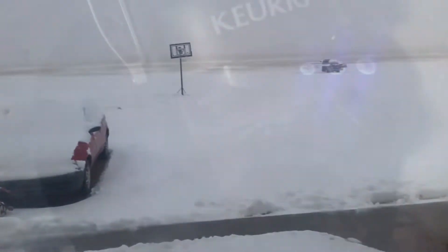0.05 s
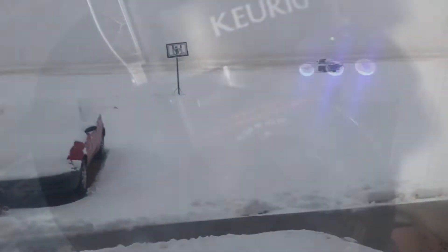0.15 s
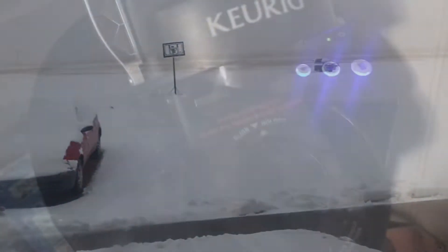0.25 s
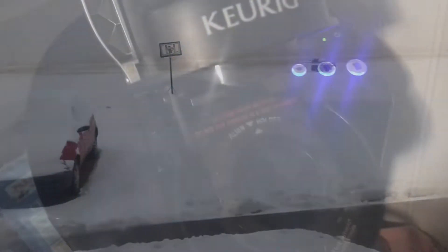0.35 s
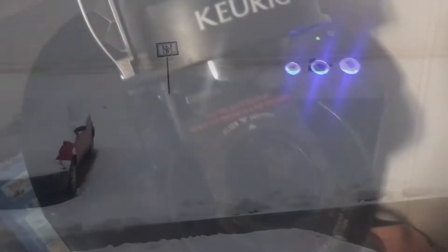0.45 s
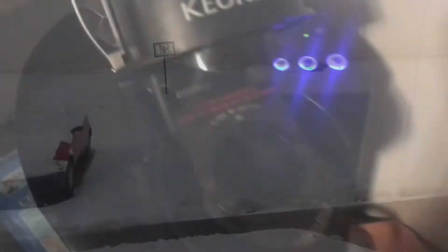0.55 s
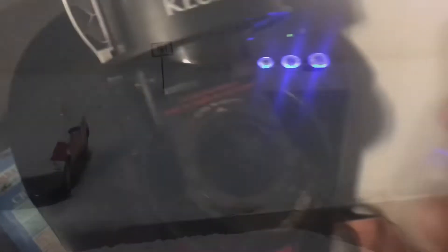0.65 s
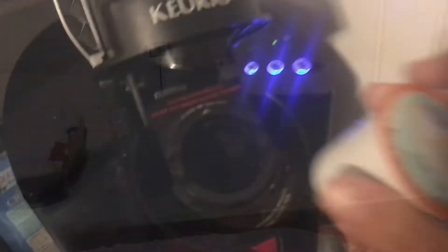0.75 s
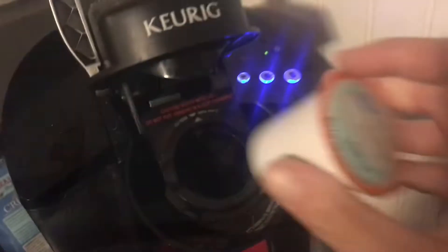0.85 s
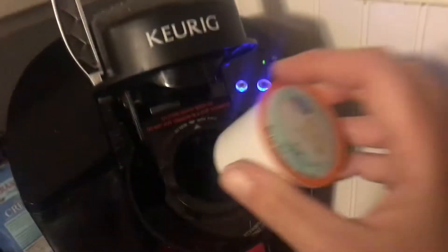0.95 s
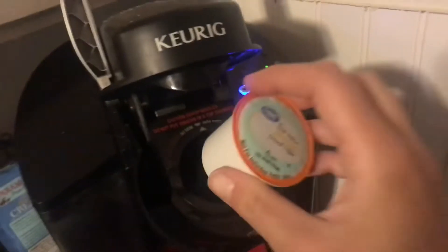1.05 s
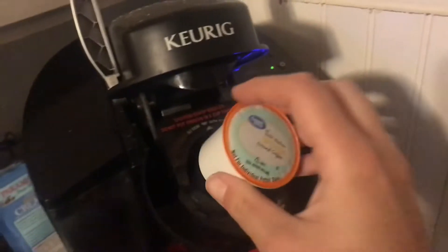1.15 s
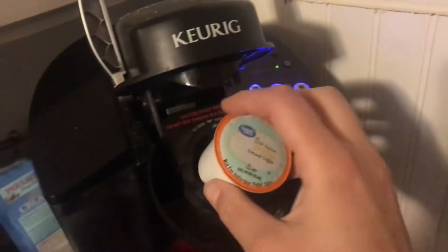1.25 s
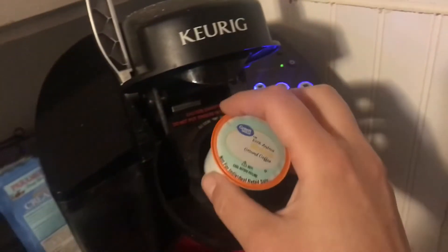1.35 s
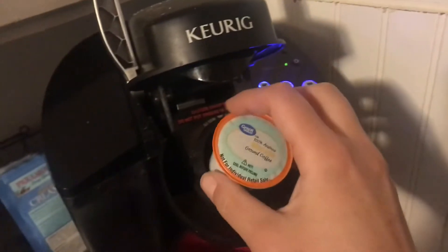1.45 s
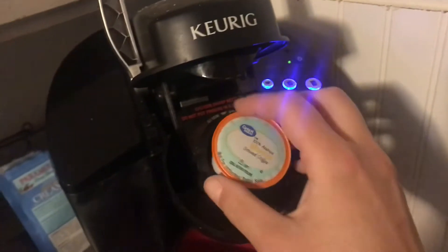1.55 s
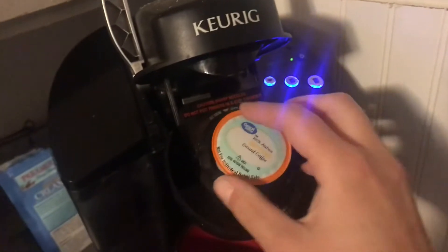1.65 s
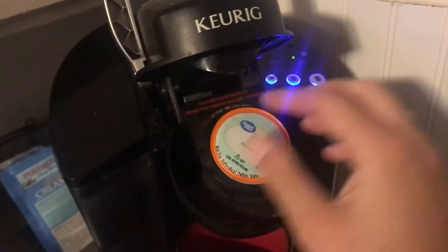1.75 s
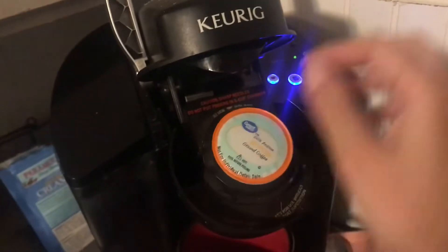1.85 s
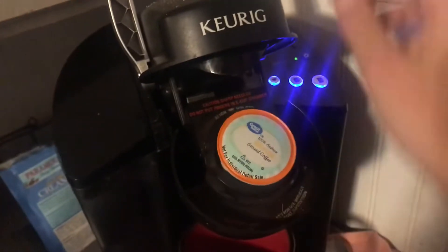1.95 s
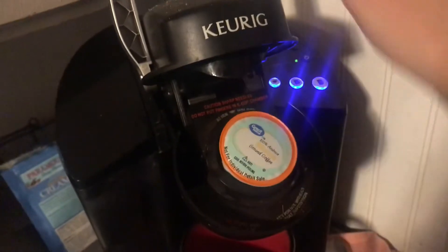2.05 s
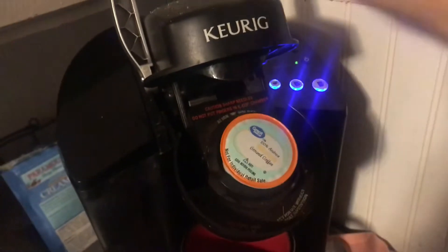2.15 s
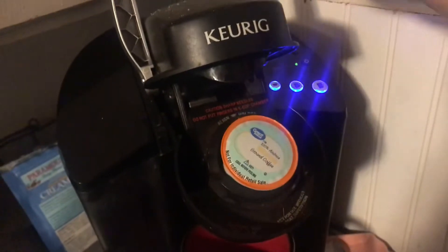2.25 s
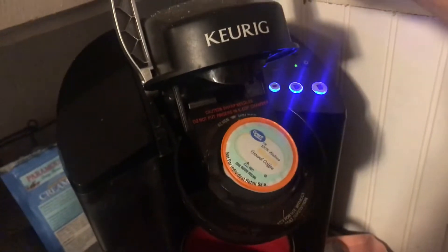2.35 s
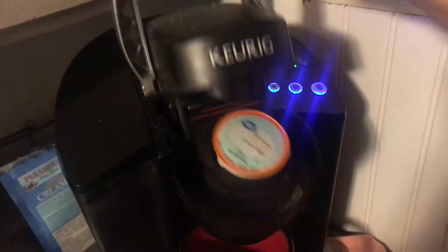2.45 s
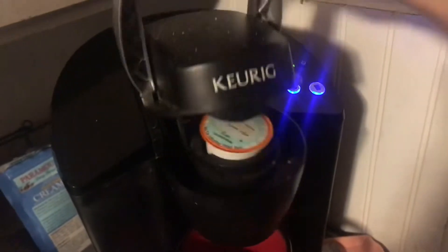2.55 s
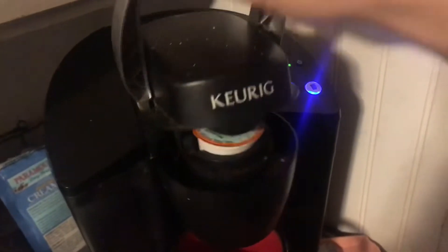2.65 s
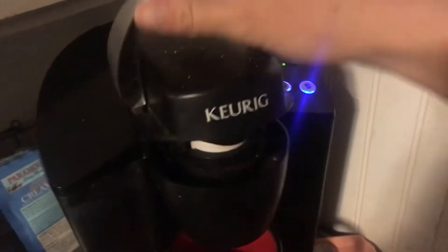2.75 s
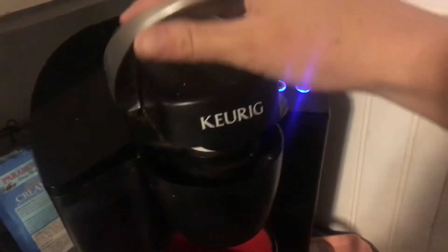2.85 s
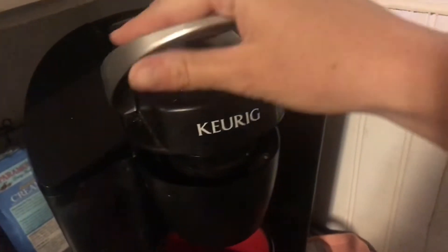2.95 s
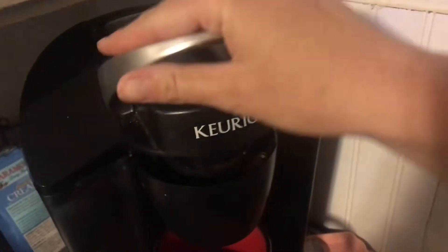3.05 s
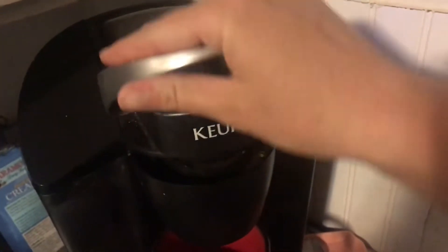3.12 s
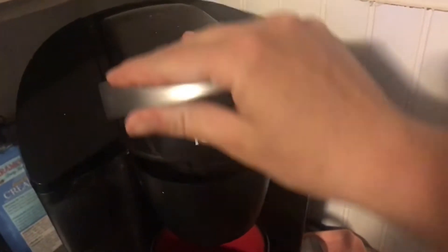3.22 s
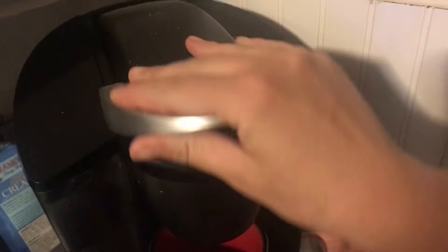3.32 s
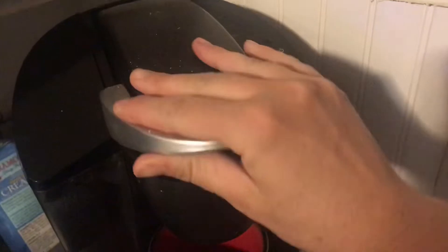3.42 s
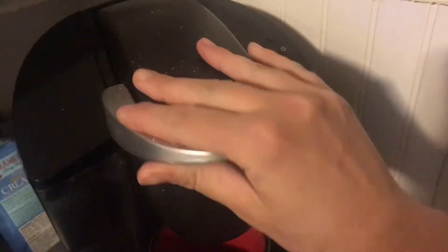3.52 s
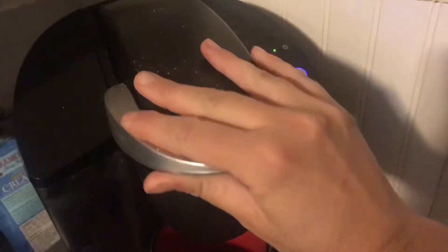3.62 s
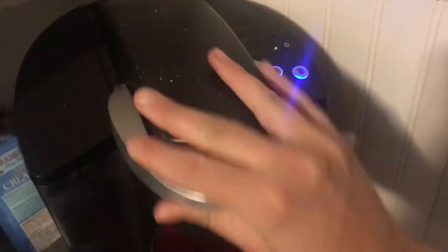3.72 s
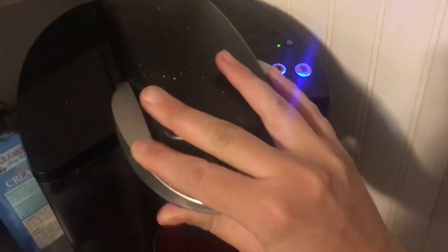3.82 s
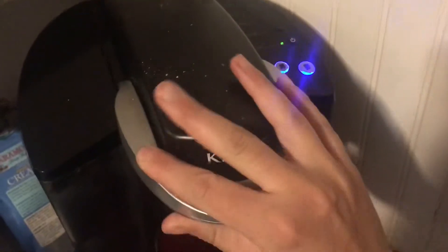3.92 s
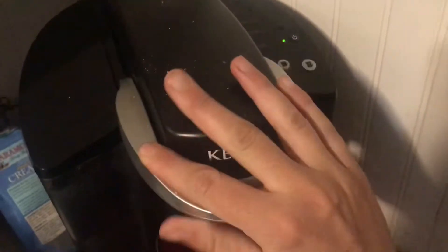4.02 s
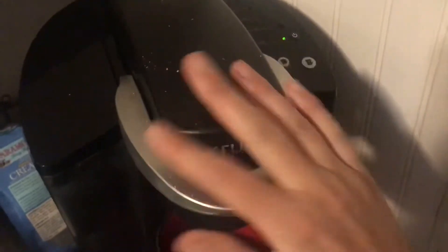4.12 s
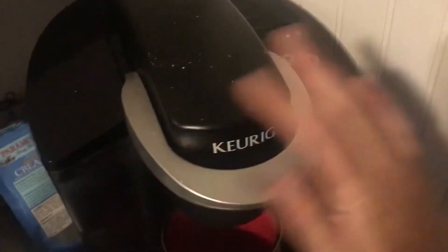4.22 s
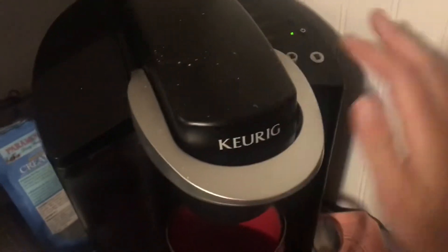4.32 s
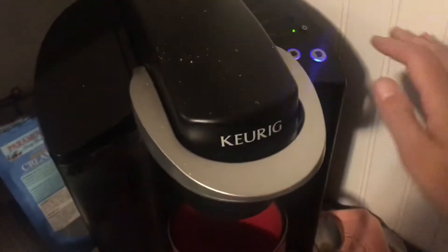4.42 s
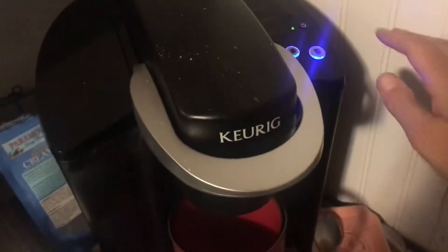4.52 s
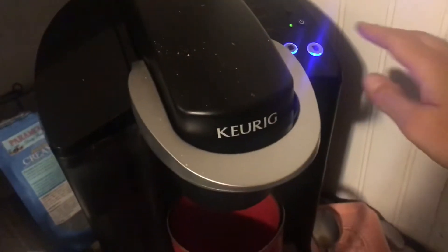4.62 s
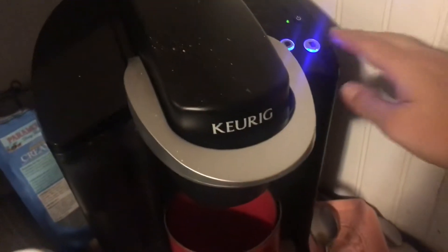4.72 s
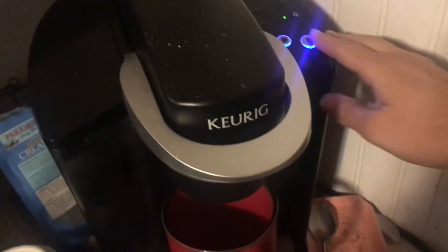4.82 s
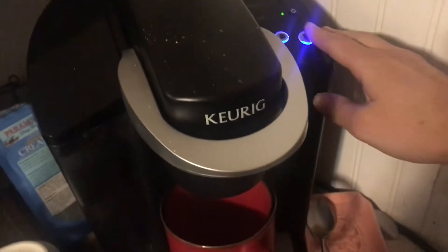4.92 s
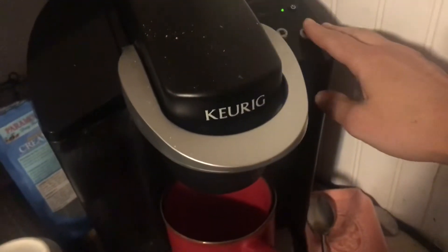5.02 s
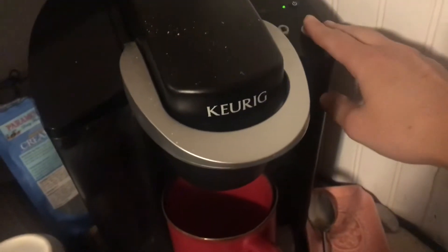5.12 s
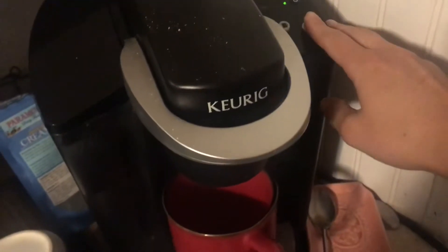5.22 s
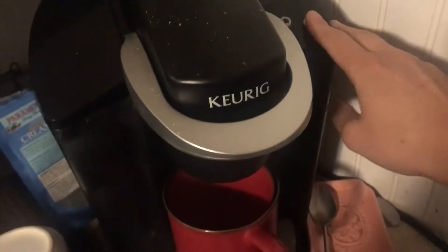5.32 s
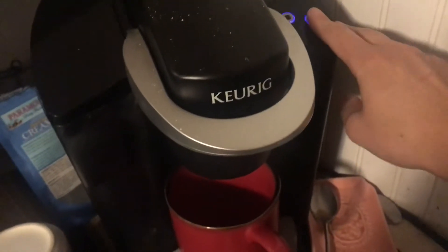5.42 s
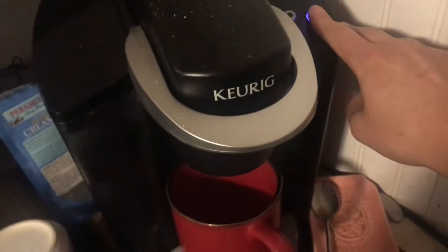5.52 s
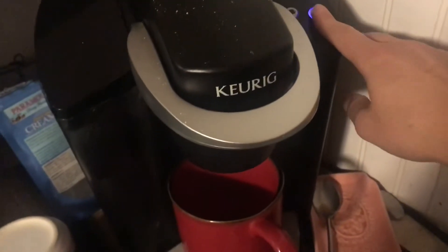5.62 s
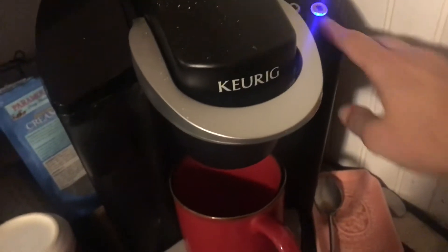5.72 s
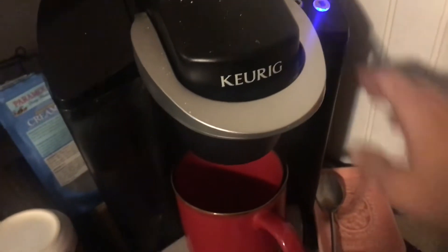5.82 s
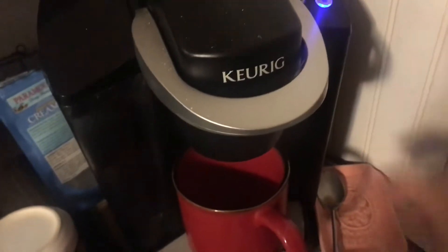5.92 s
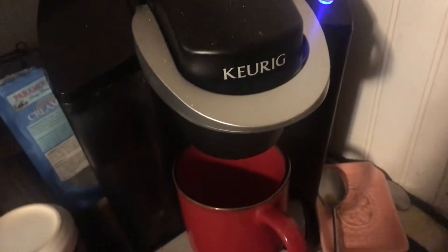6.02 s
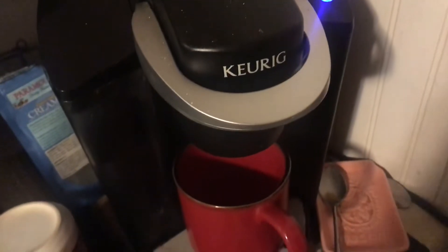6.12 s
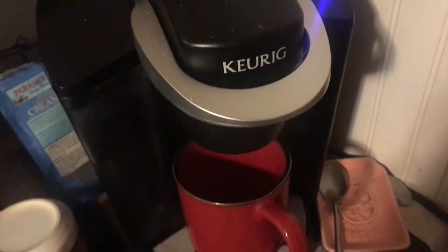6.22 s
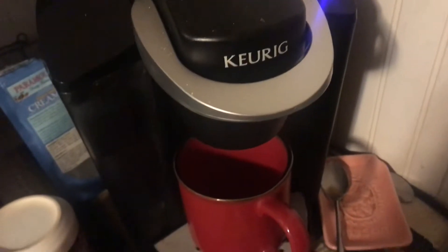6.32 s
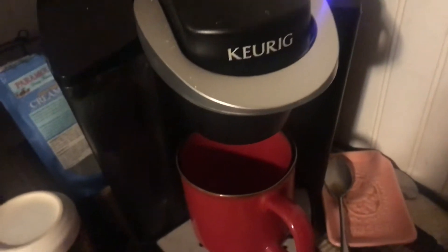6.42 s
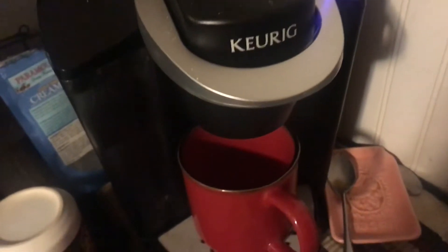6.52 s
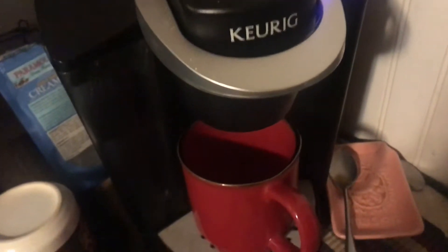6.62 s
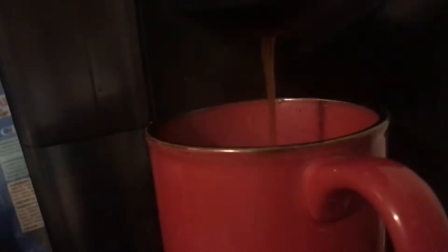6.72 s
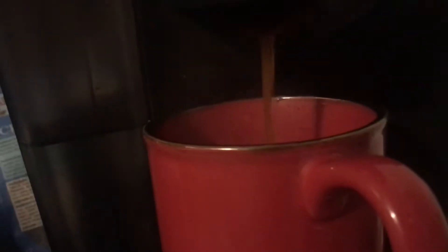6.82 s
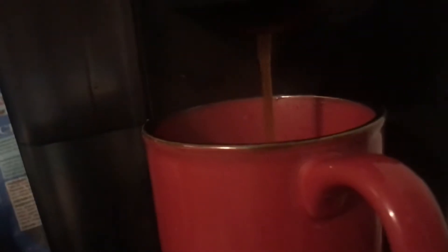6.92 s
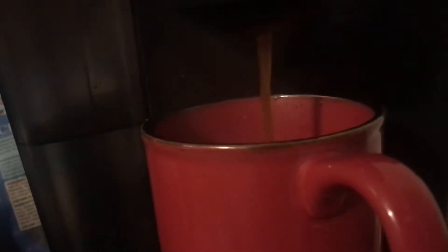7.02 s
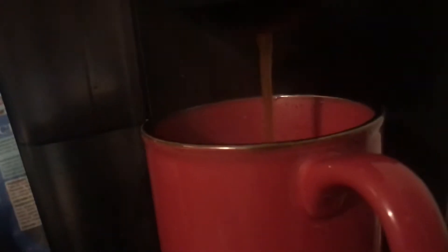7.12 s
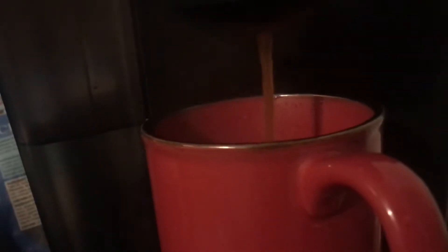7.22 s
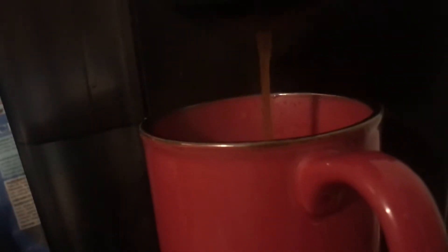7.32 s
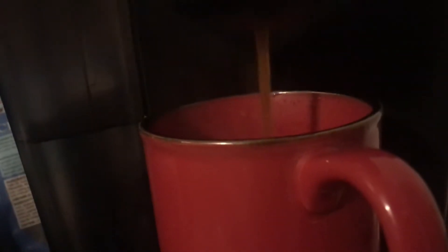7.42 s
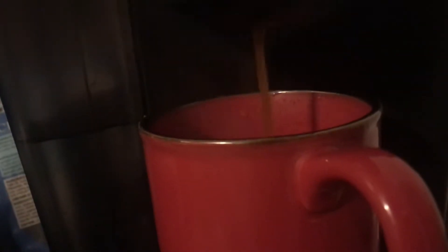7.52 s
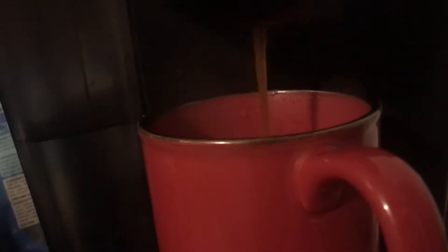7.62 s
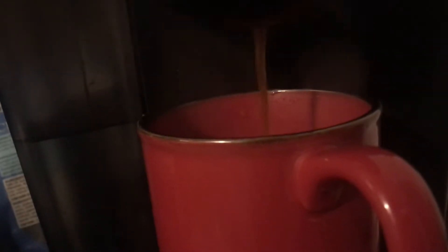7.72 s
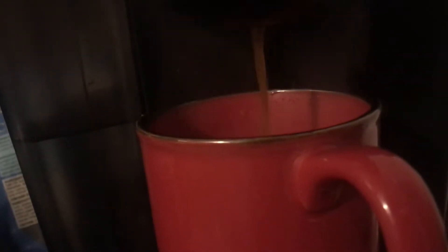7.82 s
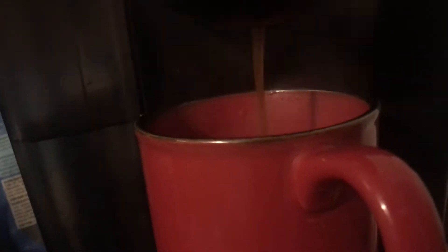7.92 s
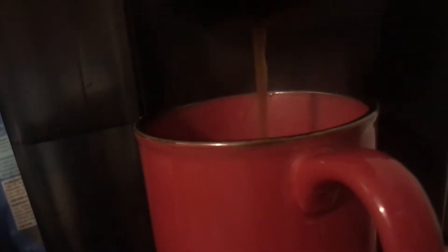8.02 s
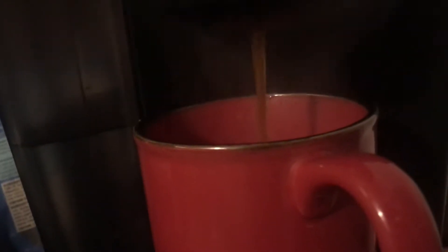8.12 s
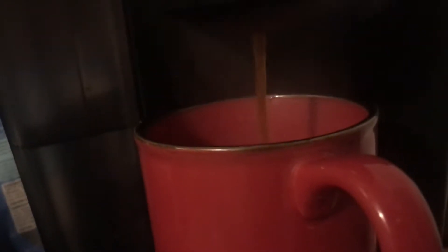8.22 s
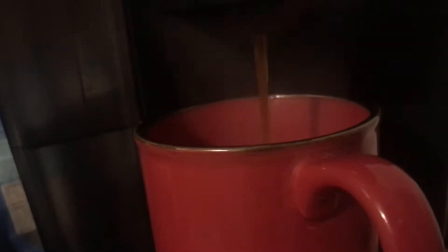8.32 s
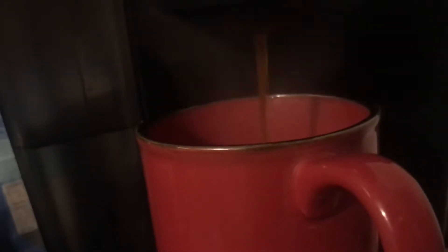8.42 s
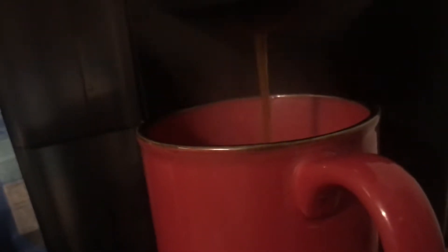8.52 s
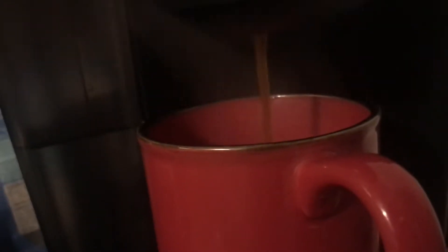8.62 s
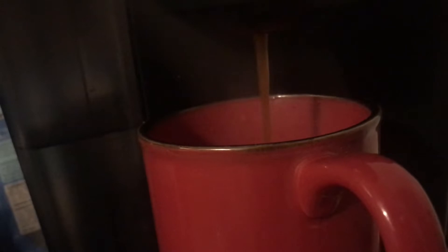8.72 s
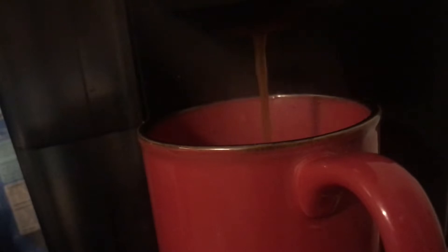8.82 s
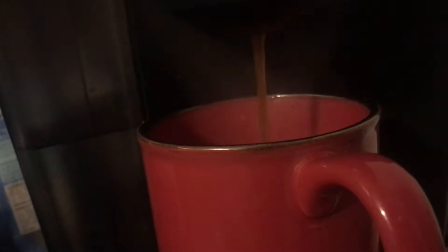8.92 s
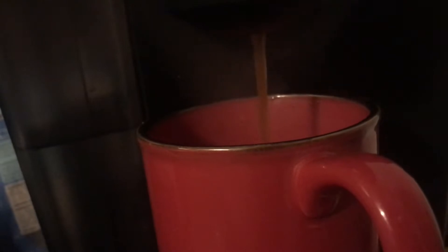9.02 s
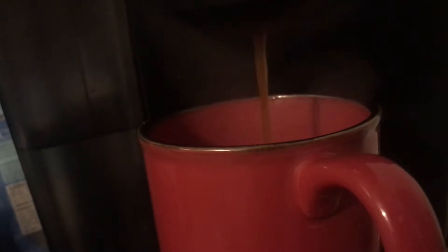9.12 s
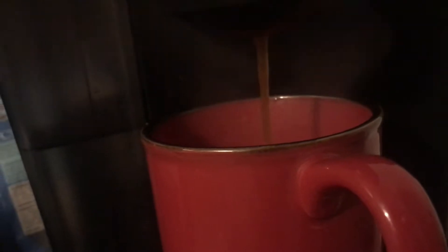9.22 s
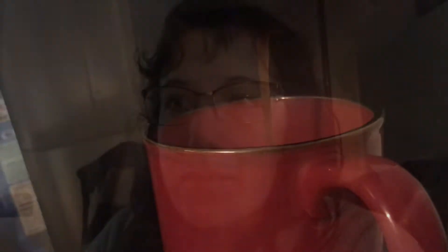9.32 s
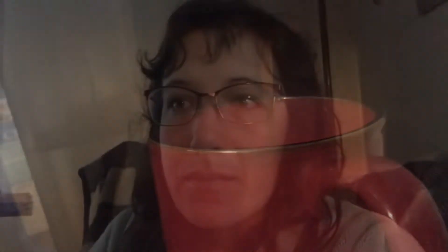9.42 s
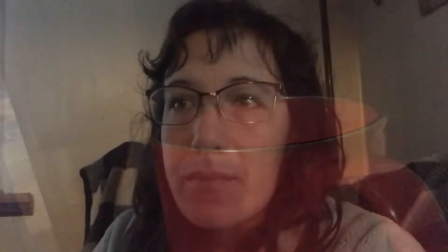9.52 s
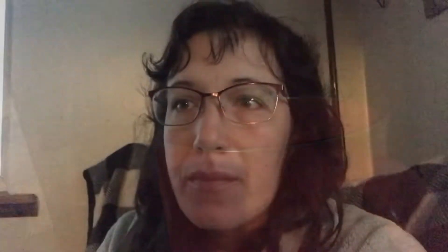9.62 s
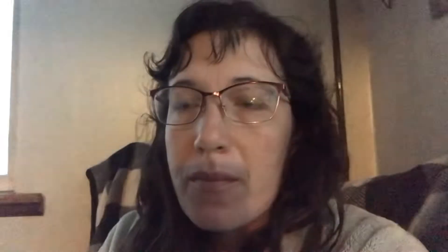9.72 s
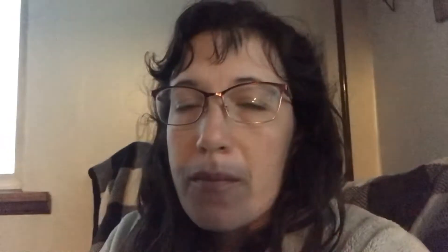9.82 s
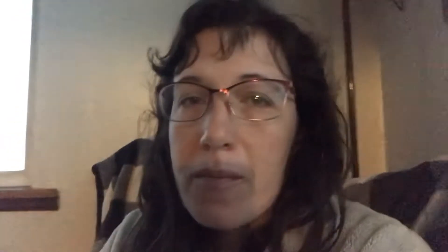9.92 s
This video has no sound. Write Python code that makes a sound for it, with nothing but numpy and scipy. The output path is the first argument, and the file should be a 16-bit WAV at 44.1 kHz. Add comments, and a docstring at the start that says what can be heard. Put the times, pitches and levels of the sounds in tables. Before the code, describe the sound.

A plastic pod knocks into a coffee machine, the lid creaks down and latches with a loud bang, then coffee trickles into a ceramic mug.

```python
"""A single-cup coffee machine, heard close up in a small kitchen: a plastic pod is seated, the lid is drawn
down, latches with a bang and its handle snaps home. Buttons click, the water line gulps, and coffee streams
into a ceramic mug over the low drone of the pump. Contacts are dying noise that rings the plastic case, and
creaks are slips that ring its walls; drops and bubbles are damped sines and clicks that ring, coloured by the
mug; pump, opening hiss and quiet hush are coloured noise."""
import sys
import numpy as np
from scipy import signal
from scipy.fft import rfft, irfft, next_fast_len
from scipy.io import wavfile

SR = 44100
rng = np.random.default_rng(int(sys.argv[2]) if len(sys.argv) > 2 else 0)


def generate_wav(signal):
    """Clip the signal to [-1, 1] and save it as 16-bit WAV at the path in sys.argv[1]."""
    frames = np.transpose(np.atleast_2d(signal))
    scaled = np.clip(frames, -1, 1) * 32767
    pcm = np.round(scaled).astype(np.int16)
    wavfile.write(sys.argv[1], SR, pcm)


N = 439236
TIME = np.arange(N) / SR   # s
BURST = 6 * SR // 10   # samples in a contact sound or room tail

# pod, lid and fingers striking the case: t/s, clack level/dB, thud level/dB, crack level/dB
CASE_KNOCKS = [(1.182, -42.5, -41.5, -55), (1.369, -38.5, -59, -52), (1.553, -45, -38.5, -45.5),
               (2.285, -40.5, -40.5, -54), (2.345, -31, -27, -34.5), (2.412, -28, -35, -54),
               (2.469, -29.5, -28, -43.5), (2.559, -39.5, -44, -52), (2.7155, -31, -34.5, -56),
               (2.828, -37, -41.5, -36.5), (3.191, -37.5, -29, -49), (3.809, -30.5, -36.5, -47),
               (3.866, -41.5, -36, -59), (4.089, -34, -43, -38), (5.313, -36.5, -45.5, -55),
               (5.552, -46.5, -45.5, -60)]
# the latch catching: t/s, level of the lid panel's ring/dB
LATCH_CATCH = (3.609, -6)
# the lid shuddering after the latch: delay/s, clack level/dB, thud level/dB, crack level/dB
LID_SHUDDERS = [(.014, -26.5, -24.5, -39), (.071, -32, -22, -41.5)]
# ring of the slammed lid panel: f/Hz, level against the latch/dB, t60/s
PANEL_MODES = [(778, -0.5, .026), (1087, 3.5, 0.028)]
# resonances of the plastic case: f/Hz, width/Hz, level above the broad response/dB
CASE_RESONANCES = [(63.5, 11, 11), (343, 80, 8), (775, 40, 12), (1044, 130, 7.5), (1293, 39, 7),
                   (1746, 55, 6), (2278, 75, 5.5), (6330, 180, 4.5)]
# broad response of the whole machine to a contact: f/Hz, level/dB (per Hz)
THUD_SPECTRUM = [(25, -26.5), (55, -0.5), (300, 0), (480, -7.5), (900, -36.5)]
# broad response of the shell to a contact: f/Hz, level/dB (per Hz)
CLACK_SPECTRUM = [(250, -23), (600, -5.5), (1000, -4), (2400, -4.5), (3300, -15), (5000, -17.5)]
# broad response of the edge to a contact: f/Hz, level/dB (per Hz)
CRACK_SPECTRUM = [(1800, -31.5), (4000, 3.5), (9000, -1), (10500, -7), (15000, -6.5)]
# resonances of the air in the mug: f/Hz, width/Hz, level above the broad response/dB
MUG_RESONANCES = [(1050, 49, 9.2), (1178, 68, 11), (2410, 160, 6.9)]
# fine spray above the mug: f/Hz, level/dB (per Hz)
FIZZ_SPECTRUM = [(2500, -2.5), (4200, 3.5), (5400, -3), (6700, 2.5), (9300, -1.5), (10800, -9.5),
                 (15000, -7)]

PLOP_T60_S = 0.0075   # shortest ring of a big bubble
BUBBLING_FOLLOWS = 0.52   # power of the flow: bubbling follows only a part of its swing


def knocks(equal_t60=.085, doubling_db=19, mode_scatter_db=2.5):
    """Pod, lid and fingers knock on the case; the heavier the thud against the clack, the longer the ring."""
    out = np.zeros(N)
    for s, clack_db, thud_db, crack_db in CASE_KNOCKS:
        # equal_t60 holds when thud and clack are equal; an excess of doubling_db doubles it
        t60 = equal_t60 * 2 ** ((thud_db - clack_db) / doubling_db)
        # each contact point favours other modes of the case
        modes = [(hz, width, db + mode_scatter_db * rng.standard_normal())
                 for hz, width, db in CASE_RESONANCES]
        add(out, s, contact(clack_db, thud_db, crack_db, t60, modes))
    return out


def latch(blow_t60=0.04, shudder_t60=0.15, ring_hz=1500, ring_db=-59, ring_t60=1.35):
    """The catch bangs and the lid clatters; then the springy handle snaps and rings on with one thin tone."""
    # the latch's blow on the case: clack level/dB, thud level/dB, crack level/dB
    blow_levels = (-5.5, -23.5, -16)
    # the handle snapping home: t/s, level/dB
    handle_snap = (4.3045, -18)
    # spectrum of the snap: f/Hz, level/dB (per Hz)
    handle_spectrum = [(850, -14), (1120, 3.5), (1550, -2), (2550, -5.5), (3200, -16), (5200, -9),
                       (6600, -18.5), (11800, -20.5), (13000, -6.5), (16000, -27)]

    out = np.zeros(N)
    latch_s = LATCH_CATCH[0]
    # above these modes the lid panel takes over
    low_modes = [mode for mode in CASE_RESONANCES if mode[0] < PANEL_MODES[0][0] / 2]
    add(out, latch_s, contact(*blow_levels, blow_t60, low_modes))
    for delay, *levels in LID_SHUDDERS:
        add(out, latch_s + delay, contact(*levels, shudder_t60, low_modes))

    snap_s, snap_db = handle_snap
    add(out, snap_s, from_db(snap_db) * burst(handle_spectrum, (), rise=0.00099, t60=0.058))
    add(out, snap_s, from_db(ring_db) * ping(ring_hz, ring_t60, rise=1 / ring_hz))
    return out


def lid_panel():
    """The slammed panel gives one short, hard ring of damped sines right under the microphone."""
    out = np.zeros(N)
    latch_s, latch_db = LATCH_CATCH
    for hz, db, t60 in PANEL_MODES:
        add(out, latch_s, from_db(latch_db + db) * ping(hz, t60, rise=0.00084))
    return out


def clicks(t60=0.04):
    """Small stiff parts of hinge and buttons click dryly around one pitch, which the case colours."""
    # hinge and buttons: t/s, level/dB, f/Hz
    click_table = [(1.863, -50.5, 6900), (2.902, -39.5, 6500), (3.243, -38, 2200), (3.2606, -37, 2960),
                   (3.2837, -26.5, 2200), (3.2993, -37, 2303), (3.327, -24.5, 2300), (4.06, -42, 1590),
                   (5.623, -42, 2800), (5.635, -40.5, 1400)]
    out = np.zeros(N)
    for s, db, hz in click_table:
        spectrum = [(hz / 8, -9), (hz / 2, -6), (hz, 0), (hz * 2, -9), (hz * 7, -30)]
        add(out, s, from_db(db) * burst(spectrum, CASE_RESONANCES, rise=0.00026, t60=t60))
    return out


def handling(rumble_db=-2.5, edge_db=-12, slips_per_s=500, slip_spread_db=4.5,
             fits_db=4.5, shell_t60=.035, squeak_db=7):
    """Plastic parts stick and slip at uneven moments, creaking through the case; sliding rasps and squeaks."""
    # hand and hinge sliding on plastic: start t/s, end t/s, level/dB, centre f/Hz
    rub_table = [(0.542, 0.672, -58, 3080), (0.775, 0.824, -48, 6900), (1.439, 1.578, -50.5, 6600),
                 (1.61, 1.683, -52.5, 6600), (2.348, 2.498, -55, 7700), (2.813, 3.137, -52, 6330),
                 (3.065, 3.285, -56, 11100), (6.043, 6.172, -61.5, 12400)]
    slips = (rng.random(N) < slips_per_s / SR) * from_db(slip_spread_db * rng.standard_normal(N))
    slipping = shell(slips, shell_t60, fits_db)
    creak = colour(slipping, CLACK_SPECTRUM, CASE_RESONANCES)
    edge = from_db(edge_db) * colour(slipping, CRACK_SPECTRUM, CASE_RESONANCES)
    rumble = from_db(rumble_db) * colour(rng.standard_normal(N), THUD_SPECTRUM, CASE_RESONANCES)
    out = rattle_strength() * (creak + edge + rumble)

    grit = shell(rng.standard_normal(N), shell_t60, fits_db / 2, count=2)
    for start, end, db, hz in rub_table:
        stroke = np.sqrt(np.hanning(np.clip(round((end - start) * SR), 2, SR)))
        rasp = [(hz / 4, -13), (hz, 0), (hz * 2, -10)]
        friction = colour(grit[round(start * SR):][:SR], rasp, [(hz, hz / 10, squeak_db)])
        add(out, start, from_db(db) * stroke * friction[:len(stroke)])
    return out


def rattle_strength(grip_s=0.022, let_go_t60=0.24, shake_db=-21.5, shake_t60=0.45):
    """Loose parts stir while the hand works the machine, and for a moment after each thud."""
    # the hand works the pod in, draws the lid down, presses it shut: start t/s, end t/s, level/dB
    hand_table = [(1.21, 1.55, -60.5), (2.314, 3.22, -52.5), (2.354, 2.453, -40.5), (3.452, 4.018, -54)]
    power = sum((from_db(db) * envelope(start, end, grip_s, let_go_t60)) ** 2
                for start, end, db in hand_table)
    thuds = [(s, thud_db) for s, _, thud_db, _ in CASE_KNOCKS]
    thuds += [(LATCH_CATCH[0] + delay, thud_db) for delay, _, thud_db, _ in LID_SHUDDERS]
    shake = envelope(0, 0, .01, shake_t60)[:SR]
    for s, db in thuds:
        add(power, s, (from_db(db + shake_db) * shake) ** 2)
    return np.sqrt(power)


def contact(clack_db, thud_db, crack_db, t60, modes):
    """A contact cracks at the edge, clacks in the shell and, a little slower, thuds in the whole machine."""
    clack = from_db(clack_db) * burst(CLACK_SPECTRUM, modes, rise=0.00025, t60=t60)
    thud = from_db(thud_db) * burst(THUD_SPECTRUM, modes, rise=.005, t60=.13)
    crack = from_db(crack_db) * burst(CRACK_SPECTRUM, modes, rise=0.00028, t60=0.61 * t60)
    return clack + thud + crack


def stream(fullest_s=7.42, bubbling_db=-44.5, build_db_per_s=9, sag_db_per_s=1, fizz_db=-55.5,
           gurgle_attack_s=0.0057, gurgle_t60=0.054, unsteady_db=3.0):
    """The jet folds in countless small bubbles that sound the mug, throws up fine fizz, and at times gurgles."""
    # clusters of bubbles dragged in by the jet: t/s, length/s, level/dB
    gurgle_table = [(6.711, 0.079, -39.5), (7.429, 0.16, -44.5), (7.578, 0.076, -33), (7.728, 0.044, -38.5),
                    (7.958, 0.071, -36.5), (8.326, .025, -36.5), (8.599, 0.03, -39.5)]
    # air in the mug: f/Hz, level/dB (per Hz)
    mug_spectrum = [(450, -15.5), (620, 1.5), (820, -8), (1200, -5), (1550, -9), (4000, -22)]

    small = grains(per_s=3500, spread_db=3.5, low_hz=520, high_hz=4040, sharpness=8.5)
    small = small * from_db(unsteady_db * drift(30))
    spray = grains(per_s=9000, spread_db=4.0, low_hz=2200, high_hz=14800, sharpness=12.0)
    spray = spray + .5 * rng.standard_normal(N)
    cluster = chirps(per_s=1100, low_hz=590, high_hz=2710, cycles=15.6, glide=0.24)

    # bubbling builds up to its fullest, then sags as the mug fills
    build_db = build_db_per_s * np.maximum(fullest_s - TIME, 0)
    level_db = bubbling_db - build_db - sag_db_per_s * since(fullest_s)
    jet = flow()
    bubbling = from_db(level_db) * jet ** BUBBLING_FOLLOWS * colour(small, mug_spectrum, MUG_RESONANCES)
    surges = sum(from_db(db) * envelope(s, s + length, gurgle_attack_s, gurgle_t60)
                 for s, length, db in gurgle_table)
    gurgling = surges * colour(cluster, mug_spectrum, MUG_RESONANCES)
    fizz = from_db(fizz_db) * jet * colour(spray, FIZZ_SPECTRUM, MUG_RESONANCES)
    return bubbling + gurgling + fizz


def drops(glide=0.13, pinch_db=-4.0, spatter_t60=0.013, long_ring_hz=682, long_ring_power=6.7,
          bay_db=-19.0, bay_delay_s=.0077):
    """Big bubbles pinch off with a tick and ring upward, droplets burst; the bay around the mug echoes them."""
    # big bubbles in the mug: t/s, peak level/dB, f/Hz
    plop_table = [(6.716, -23, 860), (6.881, -29, 905), (7.002, -19, 573), (7.039, -21.5, 740),
                  (7.067, -25, 1620), (7.072, -23.5, 2240), (7.111, -23, 797), (7.111, -26.5, 2550),
                  (7.268, -26.5, 780), (7.367, -25, 870), (7.686, -17, 914), (7.819, -18, 856),
                  (7.868, -28, 746), (7.890, -26, 830), (7.970, -22, 794), (8.015, -24, 1170),
                  (8.032, -34, 4100), (8.118, -25, 750), (8.162, -19.5, 886), (8.272, -28, 1170),
                  (8.314, -27, 780), (8.377, -31, 4080), (8.477, -22, 904), (8.607, -19, 1170),
                  (8.923, -26.5, 1060), (8.932, -27, 1000), (8.997, -26.5, 756), (9.062, -12, 703),
                  (9.369, -21.5, 710), (9.591, -35.5, 620)]
    # droplets bursting: t/s, peak level/dB, f/Hz
    spatter_table = [(6.716, -23, 13200), (6.863, -22, 6900), (7.147, -29.5, 6380), (7.527, -21, 13200),
                     (7.98, -23, 3750), (8.530, -19.5, 4230), (8.785, -11, 6500), (9.037, -30.5, 3600),
                     (9.349, -26.5, 6750)]
    pinch_spectrum = [(900, -2), (2400, 0), (4500, -8), (15000, -24)]

    out = np.zeros(N)
    for s, db, hz in plop_table:
        # bubbles ring briefly, except the deep ones near the air resonance of the mug
        t60 = PLOP_T60_S * (1 + (long_ring_hz / hz) ** long_ring_power)
        add(out, s, from_db(db) * ping(hz, t60, rise=0.00098, glide=glide, hold=2))
        short = PLOP_T60_S / t60   # deep, long-ringing bubbles pinch off softly
        pinch = burst(pinch_spectrum, MUG_RESONANCES, rise=.0002, t60=.01)
        add(out, s, short * from_db(db + pinch_db) * pinch)
    for s, db, hz in spatter_table:
        spectrum = [(hz / 4, -12), (hz, 0), (hz * 3, -17)]
        tick = burst(spectrum, [(hz, hz / 10, 9)], rise=0.00029, t60=spatter_t60)
        add(out, s, from_db(db) * tick / np.abs(tick).max())
    return out + from_db(bay_db) * np.interp(TIME - bay_delay_s, TIME, out)


def patter(plip_db=-52, splash_db=-55.0, splashes_per_s=45, spread_db=5.0, splash_t60=0.013):
    """Stray drops plip low on the surface, and their splashes crackle as short bursts of noise."""
    plips = chirps(per_s=90, low_hz=608, high_hz=1500, cycles=8.7, glide=0.23)
    sizes = from_db(spread_db * np.minimum(rng.exponential(1, N), 3))
    hits = (rng.random(N) < splashes_per_s / SR) * sizes
    decay = from_db(-60 / (splash_t60 * SR))   # gain per sample
    splashes = signal.lfilter([1], [1, -decay], hits + 1e-18) * rng.standard_normal(N)
    crackle = from_db(splash_db) * colour(splashes, FIZZ_SPECTRUM, MUG_RESONANCES)
    return flow() ** BUBBLING_FOLLOWS * (from_db(plip_db) * plips + crackle)


def flow(start_s=6.69, eases_s=8.88, stop_s=9.5, attack_s=.025, ease_db_per_s=9, drain_t60=.26):
    """Strength of the jet: 1 at full flow, then the pump eases off and stops, and the line drains."""
    return envelope(start_s, stop_s, attack_s, drain_t60) * from_db(-ease_db_per_s * since(eases_s))


def pump(drone_db=-55.0, gulp_start_s=6.463, gulp_end_s=6.66, gulp_db=-34, gulp_attack_s=0.058,
         gulp_fade_db_per_s=71.5):
    """Water gulps into the line just before the stream, then the pump drones through the case."""
    # pump drone: f/Hz, level/dB (per Hz)
    drone_spectrum = [(25, -15), (48, 3), (72, -4.5), (285, -2.5), (420, -13.5)]
    # gulp of the water line: f/Hz, level/dB (per Hz)
    gulp_spectrum = [(60, -19), (95, 4.5), (130, -21), (290, 4), (430, -13.5), (1000, -21.5), (8000, -45)]
    swell = envelope(gulp_start_s, gulp_end_s, gulp_attack_s, t60=0.08)
    swell = swell * from_db(gulp_db - gulp_fade_db_per_s * since(gulp_start_s))
    gulp = swell * colour(rng.standard_normal(N), gulp_spectrum)
    drone = from_db(drone_db) * flow() * colour(rng.standard_normal(N), drone_spectrum)
    return gulp + drone


def kitchen(x, t60=0.41, treble_t60=0.3, wall_hz=3000):
    """Diffuse reflections of a small room, as decaying noise; the treble dies first."""
    t = TIME[:BURST]
    lowpass = signal.butter(2, wall_hz, fs=SR, output="sos")
    dull = signal.sosfilt(lowpass, rng.standard_normal(BURST)) * from_db(-60 * t / t60)
    bright = .5 * rng.standard_normal(BURST) * from_db(-60 * t / treble_t60)
    tail = (dull + bright) * (t > .005)   # the first reflections arrive after 5 ms
    return signal.fftconvolve(x, tail / np.sqrt(np.sum(tail ** 2)))[:N]


def background(hush_db=-63.5, hiss_over_hush_db=3.5, hiss_fade_s=0.78):
    """A louder hiss at the start fades away into a steady quiet hush, both as the same coloured noise."""
    # opening hiss and quiet hush alike: f/Hz, level/dB (per Hz)
    quiet_spectrum = [(25, -24), (49, -3), (175, -7.5), (545, -18.5), (2350, -28), (16000, -38)]
    hiss = from_db(hiss_over_hush_db) * np.exp(-TIME / hiss_fade_s)
    return from_db(hush_db) * (1 + hiss) * colour(rng.standard_normal(N), quiet_spectrum)


def grains(per_s, spread_db, low_hz, high_hz, sharpness, count=20):
    """Random clicks of uneven size, each ringing at one pitch; the favoured pitches keep changing; rms 1."""
    at = np.flatnonzero(rng.random(N) < per_s / SR)
    sizes = from_db(spread_db * np.minimum(rng.exponential(1, N)[at], 4)) * rng.choice([-1, 1], N)[at]
    dealt = rng.integers(count, size=N)[at]   # which pitch each click gets
    out = np.zeros(N)
    for k, hz in enumerate(np.geomspace(low_hz, high_hz, count)):
        impulses = np.full(N, 1e-18)
        impulses[at] += sizes * (dealt == k) * from_db(3.5 * drift(20)[at])
        out += signal.lfilter(*signal.iirpeak(hz, max(sharpness, 2), fs=SR), impulses)
    return rms_one(out)


def chirps(per_s, low_hz, high_hz, cycles, glide, range_db=22):
    """Bubbles of all sizes and strengths ring for some cycles and climb as they near the surface; rms 1."""
    out = np.zeros(N)
    for when, size, strength, life in rng.random((N // 20, 4))[:int(per_s * N / SR)]:
        hz = low_hz * (high_hz / low_hz) ** size
        t60 = cycles * (.5 + life) / hz
        gain = from_db(range_db * strength ** 2)   # mostly weak
        add(out, when * TIME[-1], gain * ping(hz, t60, t60 / 10, glide * life))
    return rms_one(out)


def shell(x, t60, fits_db, count=5):
    """Thin walls ring with many close modes; contact shifts in fits between unlike points; rms 1."""
    out = np.zeros(N)
    for _ in range(count):
        walls = rng.standard_normal(BURST) * from_db(-60 * TIME[:BURST] / t60)
        out += signal.fftconvolve(x * from_db(fits_db * drift(20)), walls)[:N]
    return rms_one(out)


def burst(spectrum, modes, rise, t60):
    """A dying rattle of tiny contacts, as noise, rings a body; about rms 1 at its start."""
    t = TIME[:BURST]
    shape = (1 - np.exp(-t / rise)) * from_db(-60 * t / t60)
    return colour(rng.standard_normal(BURST) * shape, spectrum, modes) * np.sqrt(np.mean(shape ** 2))


def ping(hz, t60, rise, glide=0, hold=1):
    """A damped sine that swells briefly and may climb as it dies; hold above 1 rounds its top; peak about 1."""
    t = TIME[:round(t60 * SR) + 2]
    shape = (1 - np.exp(-t / rise)) ** 2 * from_db(-60 * (t / t60) ** hold)
    pitch = hz * (1 + glide * t / t60)
    return shape / shape.max() * np.sin(2 * np.pi * np.cumsum(pitch) / SR)


def colour(x, spectrum, modes=()):
    """Causal filter with a broad spectrum and resonant peaks on top; rms 1."""
    size = 2 * next_fast_len(len(x) // 2 + 1, real=True)
    hz = np.fft.rfftfreq(size, 1 / SR) + 1
    points_hz, points_db = np.transpose(spectrum)
    octaves_outside = np.abs(np.log2(hz / np.clip(hz, points_hz.min(), points_hz.max())))
    level = np.interp(np.log(hz), np.log(points_hz), points_db)
    level = level - 20 * np.minimum(octaves_outside, 2)   # 20 dB per octave, for two octaves
    for centre, width, db in modes:
        level += db / (1 + (2 * (hz - centre) / width) ** 2)
    cepstrum = irfft(np.log(from_db(level)))
    response = np.exp(rfft(2 * cepstrum[:size // 2], size))   # minimum phase: nothing sounds early
    return rms_one(irfft(rfft(x, size) * response)[:len(x)])


def envelope(start, end, attack, t60):
    """Rise, hold until the end, then die away."""
    return np.minimum(since(start) / attack, 1) * from_db(-60 * since(end) / t60)


def since(s):
    """Seconds since time s, zero before it."""
    return np.maximum(TIME - s, 0)


def drift(rate):
    """Slow random wander: straight lines between random points of spread 1, rate points per second."""
    knots = rng.standard_normal(4000)
    return np.interp(TIME * rate, np.arange(len(knots)), knots)


def from_db(db):
    """Decibels to gain."""
    return np.exp(np.asarray(db) * np.log(10) / 20)


def rms_one(x):
    """Scale to unit power."""
    return x / np.sqrt(np.mean(x ** 2) + 1e-20)


def add(out, s, sound):
    """Mix a sound in at time s."""
    at = round(s * SR)
    out[at:at + len(sound)] += sound[:N - at]


def scene():
    """Machine and mug close to the microphone, in a quiet kitchen that answers faintly."""
    machine = knocks() + clicks() + latch() + handling()
    panel = lid_panel()
    coffee = stream() + patter() + drops()
    room = kitchen(from_db(-18.5) * machine + from_db(-31.0) * panel + from_db(-22.0) * coffee)
    return (machine + panel + coffee + pump() + room + background())[None]


def record(dry, cutoff_hz=16200):
    """The microphone signal: the loudest peaks are rounded and the top is cut."""
    rounded = np.tanh(dry)
    return signal.sosfilt(signal.ellip(10, .1, 90, cutoff_hz, fs=SR, output="sos"), rounded)


dry = scene()
out = record(dry)
generate_wav(out)
```